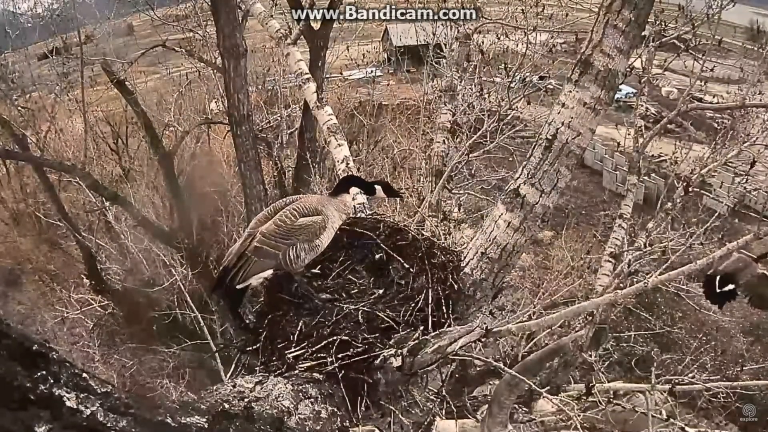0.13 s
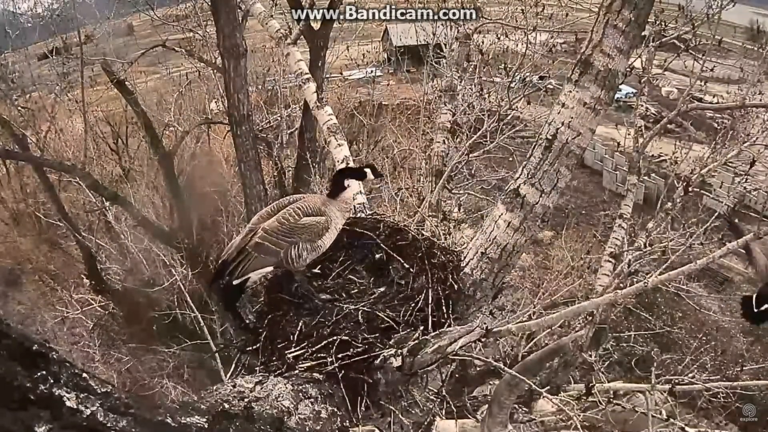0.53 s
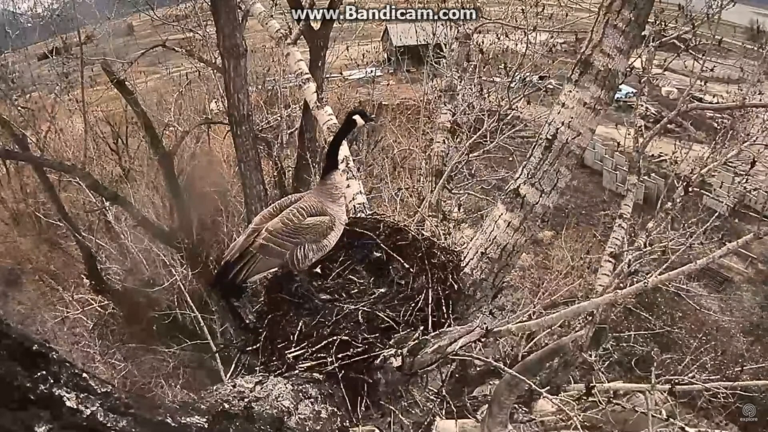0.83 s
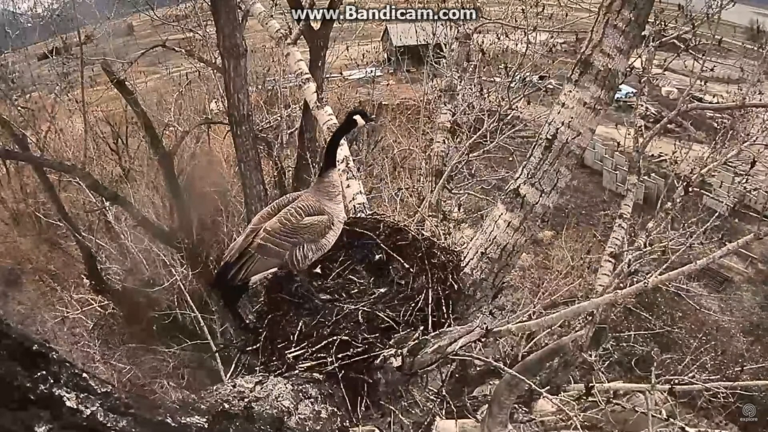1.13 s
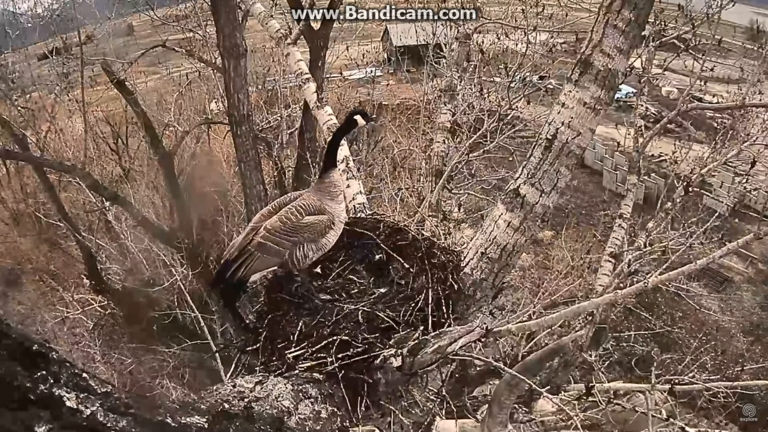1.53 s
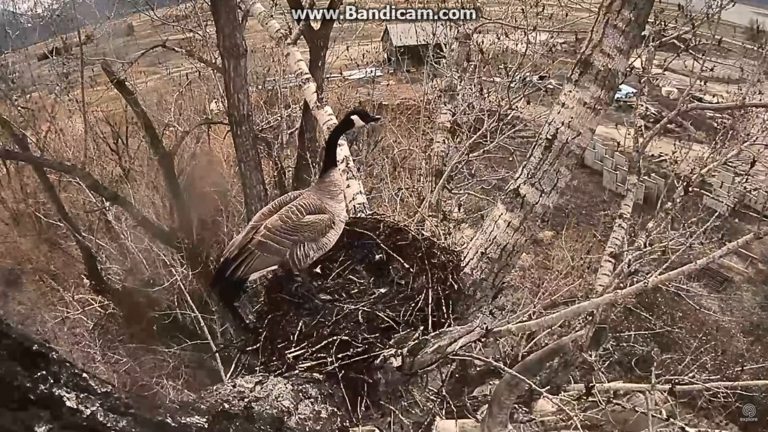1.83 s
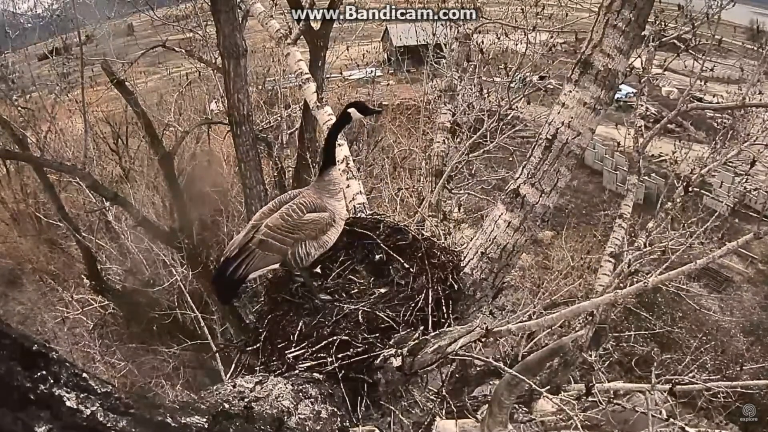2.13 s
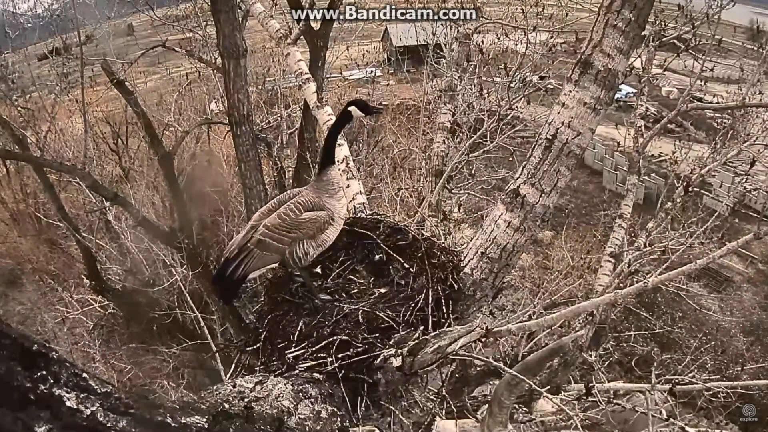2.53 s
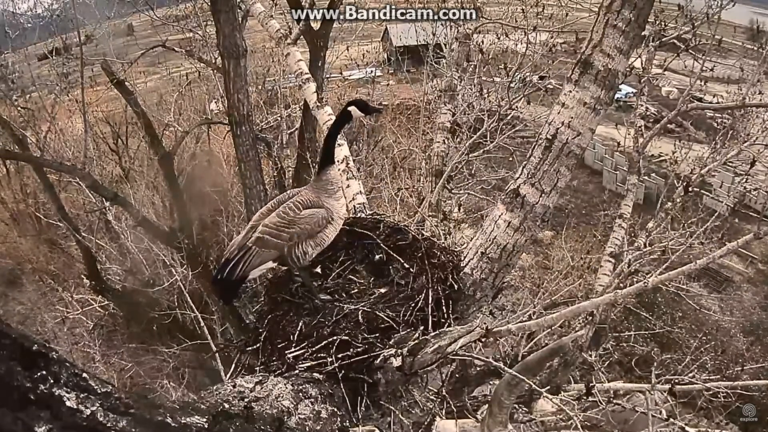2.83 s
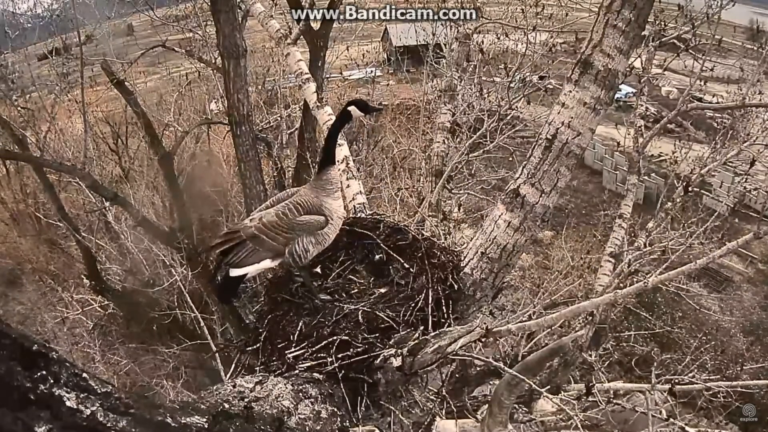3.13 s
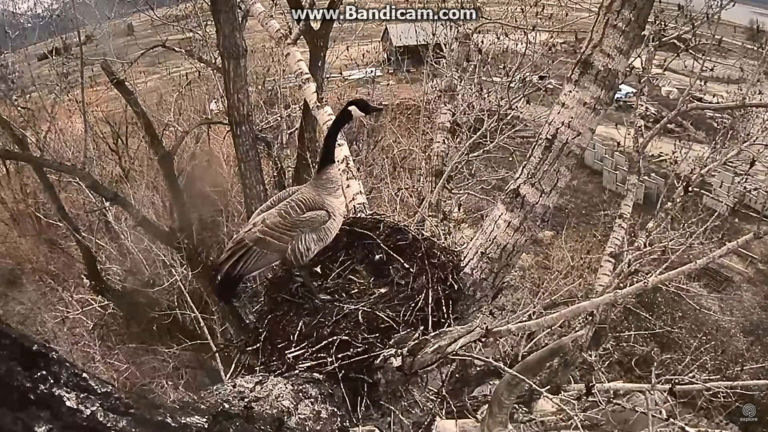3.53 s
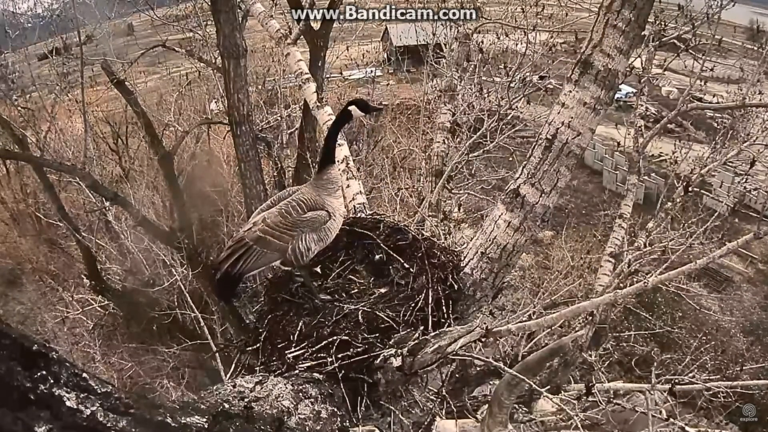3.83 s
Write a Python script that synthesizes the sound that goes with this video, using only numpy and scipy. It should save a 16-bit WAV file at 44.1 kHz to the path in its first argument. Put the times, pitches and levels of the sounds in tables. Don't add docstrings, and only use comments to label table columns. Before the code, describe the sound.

A nearby goose honks four times among bare trees: a short rough growl at 0.55 s, then growls cracking into loud, clear, slightly falling honks at 1.25, 2.25 and 3.2 s, each echoing faintly. Low wind bumps the microphone over soft hiss. Twigs tick mostly before 1.1 s, a small bird peeps at 0.5, faint frog trills recur, and a far goose answers around 1.6, 2.0, 2.9 and 3.9 s.

```python
import sys
import numpy as np
from scipy import signal
from scipy.io import wavfile
from scipy.ndimage import uniform_filter1d

SR = 44100
rng = np.random.default_rng(int(sys.argv[2]) if len(sys.argv) > 2 else 0)


def materialize(psi):
    bounded = np.clip(np.atleast_2d(psi).T, -1, 1)
    quanta = np.round(bounded * 32767).astype(np.int16)
    wavfile.write(sys.argv[1], SR, quanta)


def natural_amplitude(level_db):
    exponent = np.asarray(level_db, float) / 20
    return 10 ** exponent


N = 176400


def read(points, hz):
    f, value = np.transpose(points)
    return np.interp(np.log(hz + 1), np.log(f + 1), value)


def evened(x):
    return x / np.sqrt(np.mean(x ** 2) + 1e-20)


def add(mix, s, sound):
    part = mix[round(s * SR):][:len(sound)]
    part += sound[:len(part)]


def unroll(rows):
    s, *cols = np.transpose(rows)
    t = np.arange(s.min(), s.max(), 1 / SR)
    return s.min(), [np.interp(t, np.sort(s), c) for c in cols]


def drift(size, hz):
    white = rng.standard_normal(N if size > SR // 3 else SR // 3)
    slow = signal.sosfiltfilt(signal.butter(2, hz, fs=SR, output="sos"), white)
    return evened(slow)[:size]


def resonate(x, hz, width):
    turn = np.exp(2j * np.pi * np.cumsum(hz * np.ones(len(x))) / SR)
    r = np.exp(-np.pi * width / SR)
    return 2 * (turn * signal.lfilter([1 - r], [1, -r], x / turn + 1e-18)).real


def shaped(points, patchy_db, size):
    hz = np.fft.rfftfreq(size, 1 / SR)
    z = rng.standard_normal((4 * N // size + 5, size // 2 + 1, 3)).T
    patches = uniform_filter1d(uniform_filter1d(z[2], size=9, axis=0), size=9, axis=1)
    level_db = read(points, hz)[:, None] + patchy_db * evened(patches)
    spec = (z[0] + 1j * z[1]) * natural_amplitude(level_db)
    return evened(signal.istft(spec, nperseg=size, noverlap=3 * size // 4)[1][:N])


def soft(x):
    edge = np.arange(len(x)) / (0.007 * SR)
    return x * np.minimum(np.minimum(edge, edge[::-1]), 1)


def wind():
    # start_s, length_s, level_db
    gusts = [(.0, 0.054, -40), (0.426, 0.14, -34), (0.593, 0.087, -27.5), (0.934, 0.19, -33.5),
             (1.101, 0.18, -27.5), (1.3, 0.07, -18), (1.376, 0.2, -29.5), (1.594, 0.11, -21),
             (1.742, 0.067, -24.5), (1.768, 0.45, -31.5), (2.099, 0.083, -24.5), (2.19, 0.22, -28),
             (2.611, 0.19, -19.5), (2.874, 0.29, -31), (3.158, 0.18, -25), (3.832, 0.2, -33.5)]
    # pitch_hz, level_db (per Hz)
    rumble = [(12, -32.5), (20, -37.5), (48, 4.5), (108, -4.5), (205, -21), (900, -45), (1170, -75),
              (1980, -120)]
    force = np.full(N, natural_amplitude(-37.5))
    for start, length, db in gusts:
        swell = np.hanning(round((length + 0.017) * SR)) ** 0.59
        add(force, max(start - .02, 0), natural_amplitude(db) * swell)
    push = shaped(rumble, 1.3, size=2048)
    push = force * push / np.sqrt(uniform_filter1d(push ** 2, size=3000) + 0.29)
    return push + 0.5 * (push ** 2 - uniform_filter1d(push ** 2, size=900))


def still_air():
    # pitch_hz, level_db (per Hz)
    hiss = [(180, -7.5), (300, -10), (554, -12.5), (2720, -1), (7200, -32.5), (12100, -39.5), (13600, -42),
            (15800, -34)]
    return natural_amplitude(-48.5) * shaped(hiss, 2.2, size=512)


def trill(start, length, db):
    # pitch_hz, width_hz, level_db
    sac_rings = [(2740, 300, 27.5), (3300, 1100, 28), (4235, 200, 22.5)]
    u = np.arange(0, length, 1 / SR) / length
    clicks_hz = 68 * (1 + 0.035 * drift(len(u), 30.))
    turns = np.cumsum(clicks_hz) / SR
    drive = (0.067 + np.exp(-(turns % 1) / 0.044)) * rng.standard_normal(N)[:len(u)]
    sac = sum(natural_amplitude(d) * resonate(resonate(drive, f, w), f, w) for f, w, d in sac_rings)
    return start, natural_amplitude(db) * np.sin(np.pi * u) ** 0.19 * evened(sac)


def tick(s, db):
    t = np.arange(0, 1000) / SR
    burst = rng.standard_normal(len(t)) * natural_amplitude(-60 * t / 0.013) * np.minimum(t / 0.00051, 1)
    crack = signal.sosfilt(signal.butter(5, [2200., 5000.], "band", fs=SR, output="sos"), burst)
    return s, natural_amplitude(db) * crack / abs(crack).max()


def chirp(start, length, db, hz):
    u = np.arange(0, length, 1 / SR) / length
    whistle = np.sin(2 * np.pi * np.cumsum(hz * (1 - .13 * u)) / SR)
    return start, natural_amplitude(db) * np.sin(np.pi * u) * whistle


def growl(rows):
    # pitch_hz, width_hz, shut_db (beak shut), open_db (beak open)
    throat = [(544, 450, -8.5, -15.5), (717.5, 193, -7.5, 1), (1017, 126, 8, 1.5), (1241, 218, 4.5, 8),
              (1995, 340, -3, 2), (2376, 287, -1.5, 1.5), (3368, 410, -8, -1), (4260, 600, -20, -12)]
    jitter, smear = 0.3467, 1.29
    patchy_db, shimmer_db, least_rough = 2.5, 1.5, .07
    start, (hz, db, rough, scale) = unroll(rows)
    size = len(hz)
    rough = np.clip(rough, least_rough, 1)
    turns = np.cumsum(hz * (1 + jitter * rough * drift(size, 129.0))) / SR
    folds = sum(np.cos(2 * np.pi * k * turns + smear * rng.standard_normal()) for k in range(1, 64))
    puffs = evened(np.exp(-(turns % 1) / 0.35) * rng.standard_normal(N)[:size])
    drive = evened(folds) + rough * puffs
    drive = signal.sosfilt(signal.butter(6, 5800., fs=SR, output="sos"), drive)
    beak = np.clip(5 * (scale - 1), 0, 1)
    voice = np.zeros(size)
    for f, width, shut, wide in throat:
        gain_db = shut + (wide - shut) * beak + patchy_db * drift(size, 29.0)
        voice += natural_amplitude(gain_db) * resonate(resonate(drive, f, width), f, width)
    voice = signal.sosfilt(signal.butter(6, 450., "high", fs=SR, output="sos"), voice)
    steady = voice / np.sqrt(uniform_filter1d(voice ** 2, size=1500) + 1e-9)
    return start, soft(natural_amplitude(db + shimmer_db * drift(size, 60.0)) * steady)


def snap(s, db):
    loudest_db, lift_db = -20, 1
    t = np.arange(0, 400) / SR
    burst = rng.standard_normal(len(t)) * natural_amplitude(-60 * t / 0.0088) * np.minimum(t / 0.00076, 1)
    burst = signal.sosfilt(signal.butter(1, (3900, 9000.), "band", fs=SR, output="sos"), burst)
    return s, natural_amplitude(min(db, loudest_db) + lift_db) * burst / abs(burst).max()


def tone(rows, hoarse_db):
    partials_db = [-7, 3, 7, -9.5, -10.5, -8.5, -19.5, -16.5, -18.5, -23.5, -27.5, -23, -30, -28, -34, -55,
                   -45, -33.5, -37.5, -64.5, -63.5, -47.5]
    wobble_db, wobble_per_partial_db = 6.5, .6
    flutter_hz, rasp_db = 130, -53
    start, (hz, db, flutter, dull_db) = unroll(rows)
    size = len(hz)
    hz = uniform_filter1d(hz, size=1100, mode="nearest")
    turns = np.cumsum(hz * (1 + 0.017 * flutter * drift(size, 59.0))) / SR
    rasp = drift(size, 400.)
    depth = natural_amplitude(hoarse_db) + 2 * np.maximum(flutter - .1, 0)
    stack, power = np.zeros(size), np.zeros(size)
    for k, level_db in enumerate(partials_db, 1):
        lift = 2.7 if k == 2 else 1
        gain_db = level_db - dull_db * np.log2(k / 3) * lift
        if k != 3:
            swing_db = wobble_db + wobble_per_partial_db * max(k - 4, 0) ** .8
            gain_db = gain_db + swing_db * drift(size, 14.)
        gain = natural_amplitude(gain_db)
        hoarse = 1 + depth * np.roll(rasp, 397 * k) * min(max(k - 3, 0) / 4, 1.5)
        stack += gain * hoarse * np.cos(2 * np.pi * k * turns + k * k)
        power += gain * gain
    chop = 1 - flutter + flutter * drift(size, flutter_hz) + natural_amplitude(rasp_db) * drift(size, 2600.0)
    return start, soft(natural_amplitude(db) * chop * stack * np.sqrt(2 / power))


def far_goose(start, length, db, top_hz):
    far_partials_db = [-11.5, -1, -5, -10, -6.5]
    u = np.arange(0, length, 1 / SR) / length
    rough_low = .72 * (1 + 0.06 * drift(len(u), 152.4))
    clear = 1 - 0.0078 * u ** 3
    turns = np.cumsum(top_hz * np.where(u < .35, rough_low, clear)) / SR
    voice = sum(natural_amplitude(d) * np.cos(2 * np.pi * k * turns) for k, d in enumerate(far_partials_db, 1))
    return start, natural_amplitude(db) * np.sin(np.pi * u) ** .5 * voice


def trees(x):
    # pitch_hz, t60_s (time to fall 60 dB)
    echo_t60 = [(400, 0.65), (1060, 0.76), (2100, 1.09), (4100, 0.97), (7350, 0.14)]
    taps, first = np.zeros(SR), round(0.027 * SR)
    at = np.arange(0, SR - 40, 40) + rng.integers(0, 40, size=SR // 40)
    taps[at] = rng.standard_normal(len(at))
    hz, t, z = signal.stft(taps, SR, nperseg=256)
    fade = natural_amplitude(-60 * t / read(echo_t60, hz)[:, None])
    tail = signal.istft(z * fade, SR, nperseg=256)[1]
    echo = signal.fftconvolve(x, tail / np.linalg.norm(tail))[:N]
    return np.roll(echo, first) * (np.arange(N) > first)


def scene():
    # start_s, length_s, level_db
    trills = [(.0, 0.16, -49.5), (0.151, 0.11, -45), (0.422, 0.14, -45.5), (0.801, .11, -46),
              (1.068, 0.083, -46.5), (1.737, 0.064, -47.5), (2.019, 0.13, -49), (2.662, 0.13, -50),
              (2.999, 0.13, -48), (3.637, .13, -49.5), (3.932, 0.084, -50)]
    # start_s, peak_db
    ticks = [(0.0144, -38), (0.0672, -36), (0.169, -34), (0.1835, -39), (0.2003, -39), (0.2144, -36),
             (0.3012, -34), (0.3337, -35), (0.374, -39), (0.4455, -38), (0.4723, -27.5), (0.4848, -23.5),
             (0.8674, -30.5), (0.8915, -24.5), (1.0725, -37), (1.0996, -46), (1.1078, -47)]
    # start_s, length_s, level_db, start_hz
    chirps = [
        (0.508, 0.03, -36.5, 3040),
        (3.757, 0.08, -54, 2800),
    ]
    # time_s, pulse_hz, level_db, roughness (0-1), beak (opens from 1 to 1.2)
    growls = [
        [(.553, 174.3, -23, 0.22, 0.41), (.567, 173.6, -13.5, 0, 0.87), (.625, 176.1, -16, 0, 0.33),
         (.645, 166.9, -14, 0.42, 0.99), (.675, 164.2, -12.5, 0.02, 1.31), (.72, 162.9, -14, 0, 1.16),
         (.758, 158, -37, 0.25, 1.06)],
        [(1.245, 157.8, -29.5, 0.2, 0.96), (1.26, 163, -14.5, 0.01, 1.4), (1.28, 168.7, -17, 0.66, 0.37),
         (1.345, 171.6, -9.5, 0, 1.3), (1.375, 170, -32.5, 0.42, 1.3)],
        [(2.24, 166.6, -19.5, 0.61, 1.8), (2.29, 159, -15.5, 0.47, 1.14), (2.315, 174.6, -15.5, 0.27, 0.79),
         (2.34, 152.2, -8.5, 0, 1.1), (2.36, 165, -42, 0.3, 1.6)],
        [(3.195, 216, -17, 0.35, 2.3), (3.21, 223.9, -13.5, 0.24, 1.1), (3.24, 248, -18, 0.05, 0.87),
         (3.265, 256.5, -14, 0.25, 0.85), (3.282, 229.5, -12.5, 0.12, 1.4), (3.31, 245.7, -40.5, 0.5, 1.5)],
    ]
    # start_s, peak_db
    snaps = [(0.5601, -51.5), (0.5644, -42), (0.5741, -33.5), (0.5804, -35.5), (0.5874, -34), (0.5916, -27),
             (0.6014, -45.5), (0.612, -37), (0.6164, -48), (0.628, -35.5), (0.6425, -41.5), (0.651, -34.5),
             (0.6594, -35.5), (0.6629, -30), (0.67, -25.5), (0.6814, -30), (0.692, -36.5), (0.6984, -33.5),
             (0.705, -30.5), (1.2745, -37), (1.2875, -36.5), (1.3054, -29.5), (1.311, -34), (1.324, -31),
             (1.3284, -27), (1.3364, -30.5), (1.347, -32), (1.3555, -24.5), (2.2473, -32), (2.2524, -28.5),
             (2.2564, -39), (2.2724, -33.5), (2.2777, -27), (2.2814, -35.5), (2.3012, -34), (2.307, -30),
             (2.3184, -39.5), (2.329, -16), (2.3376, -19.5), (2.3444, 23), (3.201, -38), (3.211, -43.5),
             (3.223, -38), (3.236, -40.5), (3.245, -29), (3.251, -44.5), (3.263, -31), (3.268, -29),
             (3.2764, -12.5), (3.2815, 8)]
    # time_s, pitch_hz, level_db, flutter (0-1), dulling (dB per octave)
    tones = [
        [(1.245, 653, -27.5, 0, 16), (1.26, 671.4, -21.5, 0, 10), (1.29, 669.7, -30, 0.13, 6),
         (1.345, 688.3, -20, 0.4, -3), (1.36, 697, -3, 0.08, -1), (1.39, 686.7, -6.5, 0.1, 0.5),
         (1.432, 653, -14.5, 0.13, 3.5), (1.478, 602, -30.5, .05, 7)],
        [(2.24, 675, 1, 0, 20), (2.25, 636, -8.5, 0.6, 7.5), (2.325, 681.6, -16.5, 0.4, 0.5),
         (2.352, 692.6, -4.5, 0.17, -4), (2.418, 698.3, -7, 0.01, -4.5), (2.458, 683.3, -7.5, 0, -6.5),
         (2.486, 653, -13.5, 0, 0.5), (2.495, 646, -22, 0.04, 2), (2.52, 638, -28, 0.08, 19)],
        [(3.195, 648.4, -22, 0.01, 14.5), (3.205, 641, -9, 0.63, 6), (3.24, 660.7, -18, 1, 7),
         (3.275, 699.5, -8, 0.33, 2), (3.295, 681.3, -6, 0.2, -4.5), (3.345, 695, -7.5, 0, -5.5),
         (3.4, 659.5, -11, 0, -2), (3.41, 641, -16, 0, 3.5), (3.445, 638, -29, 0, 9)],
    ]
    hoarseness = [-11, -24, -23]
    # start_s, length_s, level_db, pitch_hz
    answers = [
        (1.632, 0.091, -45.5, 751),
        (1.967, 0.14, -42.5, 785),
        (2.945, 0.073, -43.5, 760),
        (3.876, 0.075, -43, 760),
    ]
    goose, far = np.zeros(N), np.zeros(N)
    for voice, table in ((trill, trills), (tick, ticks), (chirp, chirps), (far_goose, answers)):
        for row in table:
            add(far, *voice(*row))
    for rows in growls:
        add(goose, *growl(rows))
    for row in snaps:
        add(goose, *snap(*row))
    for rows, hoarse_db in zip(tones, hoarseness):
        add(goose, *tone(rows, hoarse_db))
    echoes = trees(natural_amplitude(-24.5) * goose + natural_amplitude(-14.0) * far)
    mix = goose + far + echoes + wind() + still_air()
    return np.array([mix, mix])


def band_limit(x):
    return signal.sosfilt(signal.butter(12, 16340, fs=SR, output="sos"), x)


def record(dry):
    hot = 0.96 * np.tanh(dry / 0.84)
    treble = signal.sosfilt(signal.butter(8, 4500., "high", fs=SR, output="sos"), hot[0])
    side = natural_amplitude(-21) * treble * drift(N, 40.)
    return band_limit(hot + np.array([side, -side]))


dry = scene()
out = record(dry)
materialize(out)
```